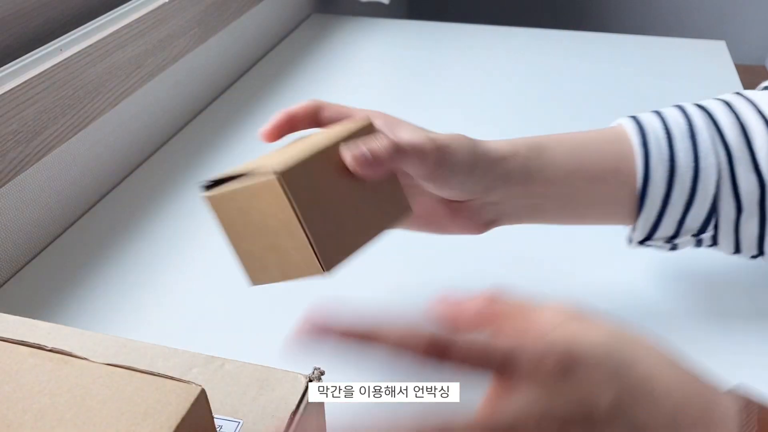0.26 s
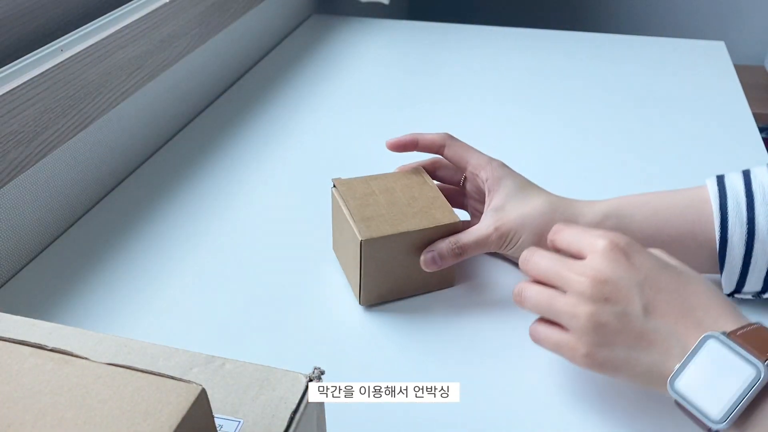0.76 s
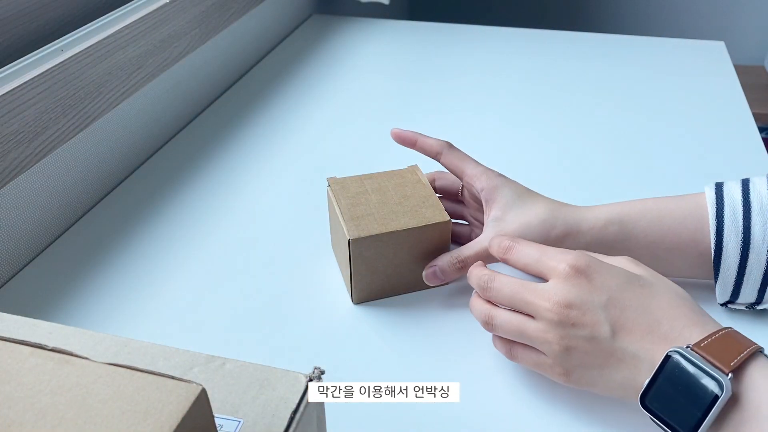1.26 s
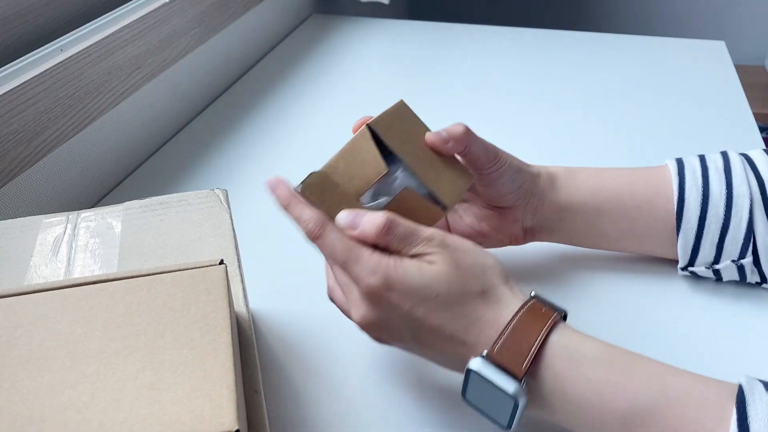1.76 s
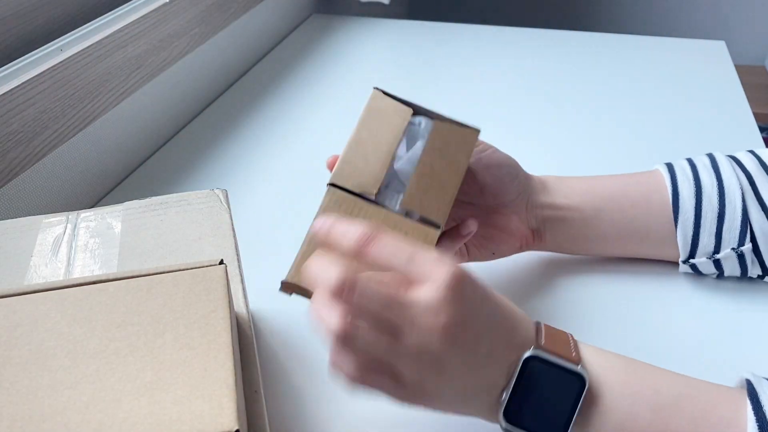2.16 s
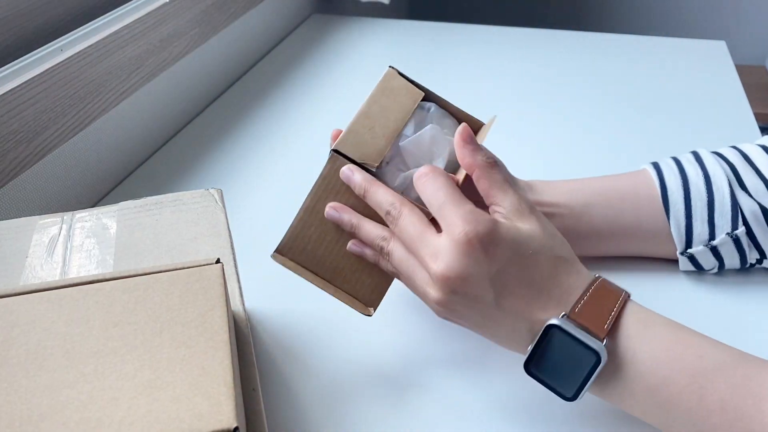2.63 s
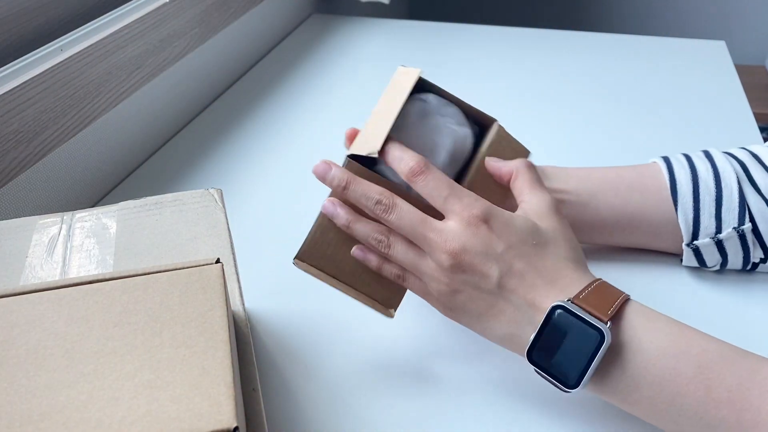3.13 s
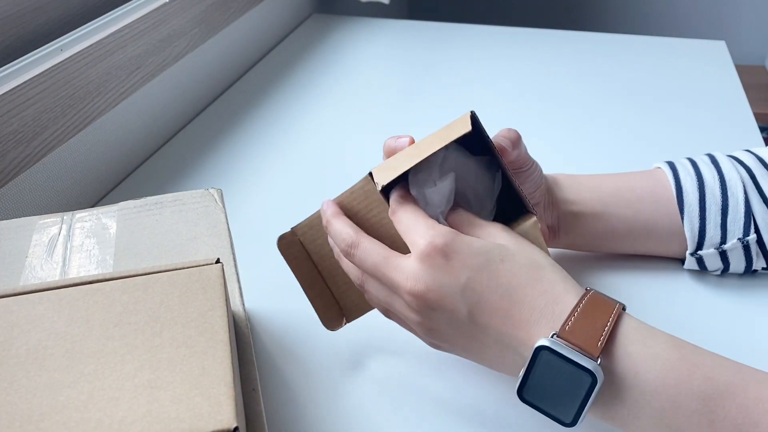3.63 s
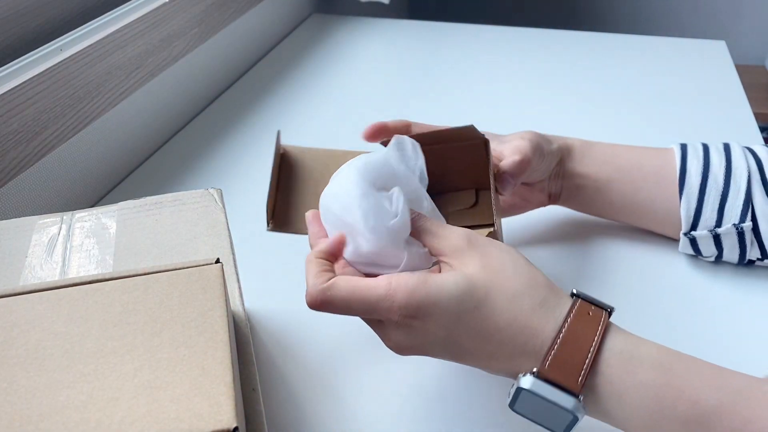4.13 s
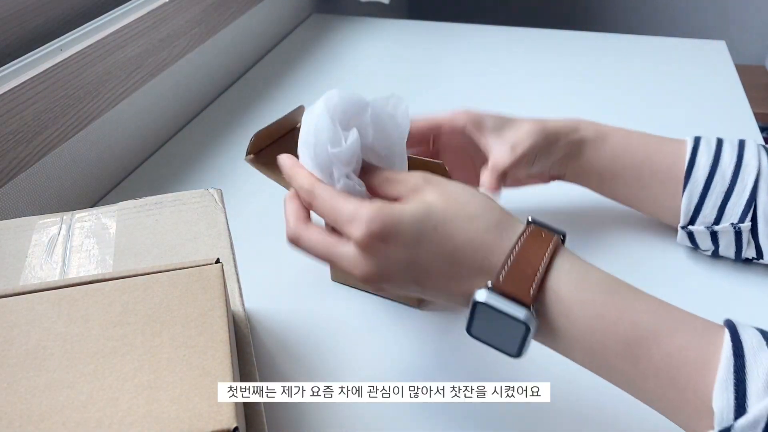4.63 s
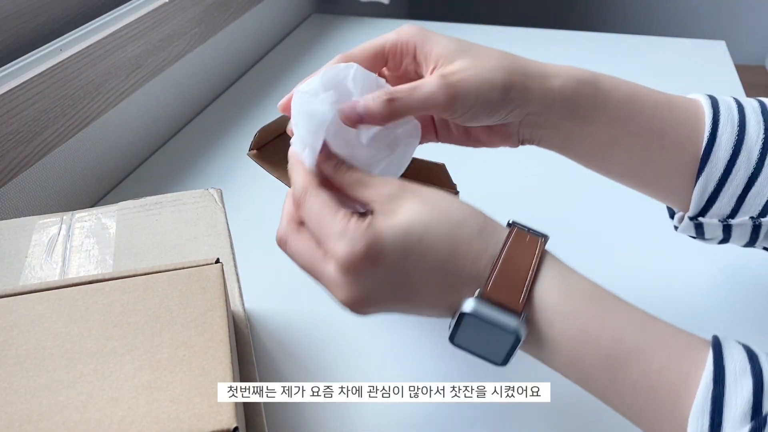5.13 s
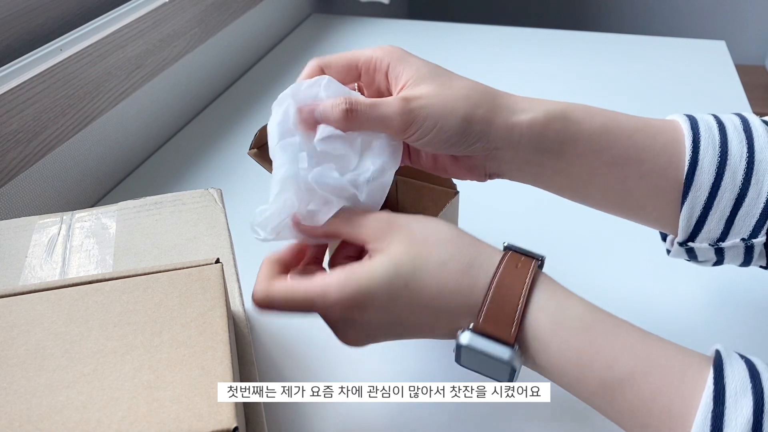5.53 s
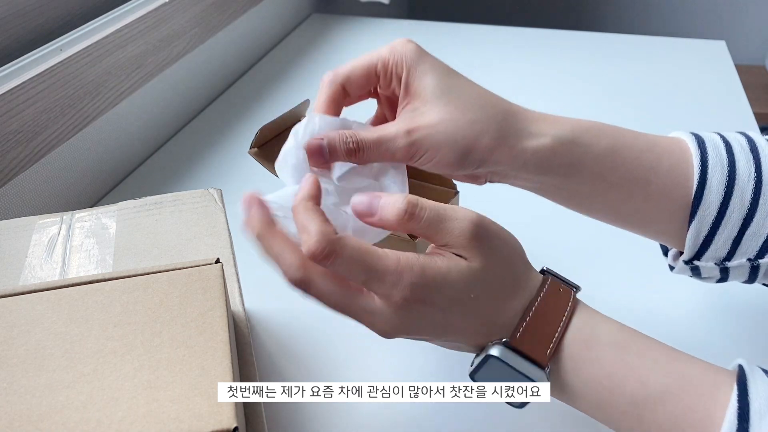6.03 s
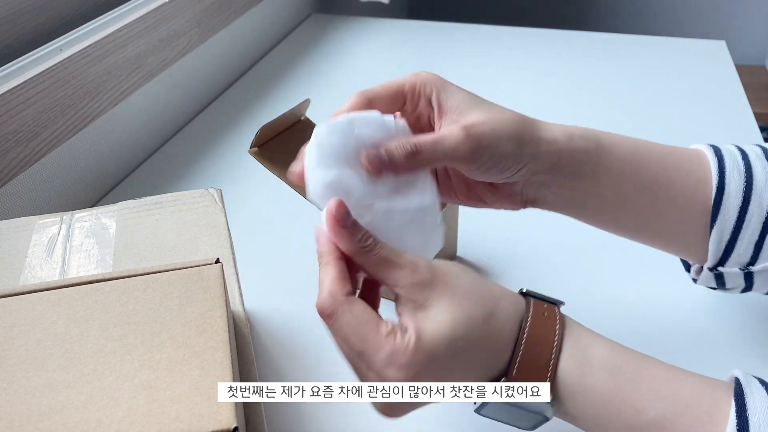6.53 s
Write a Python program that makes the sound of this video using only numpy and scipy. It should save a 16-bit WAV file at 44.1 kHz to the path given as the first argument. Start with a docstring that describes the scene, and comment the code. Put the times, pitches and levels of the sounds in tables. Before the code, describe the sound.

Soft handling rustles, sharp cardboard snaps and scrapes, one hard hollow knock, then delicate crackling tissue paper in a quiet room.

```python
"""Hands open a small cardboard box on a desk and unwrap tissue paper, heard from close by in a quiet room.
First come soft rustles and low bumps: the desk modes ring when pushed. From about 1.6 s come loud snaps,
bursts of noise, and knocks, which excite the panel modes of the box. Rubbing, noise through those modes,
and rustling, crackle over sliding noise, go on to the hardest knock near 4.6 s; after it the rustle of the
tissue and its small bright snaps prevail to the end."""
import sys
import numpy as np
from scipy import signal
from scipy.fft import rfft, irfft, next_fast_len
from scipy.io import wavfile

SR = 44100
rng = np.random.default_rng(int(sys.argv[2]) if len(sys.argv) > 2 else 0)


def dump(signal):
    """Clip the signal to [-1, 1] and save it as 16-bit WAV at the path in sys.argv[1]."""
    limited = np.clip(np.atleast_2d(signal).T, -1, 1)
    pcm = np.round(limited * 32767).astype(np.int16)
    wavfile.write(sys.argv[1], SR, pcm)


N = 298998  # samples

# Steady air noise of the quiet room. Each row: frequency in Hz, relative spectral level in dB.
AIR_SPECTRUM = [(18, -65), (30, 2.5), (73, -20.5), (273, -19), (649, -30.5), (7090, -50), (8980, -36),
                (10800, -45), (16000, -64)]
AIR_DB = -72  # rms level

# Trembling of the desk top under the arms. Each row: time in seconds, level in dB.
TREMBLE = [(0, -71), (.09, -58), (.32, -61), (.4, -74), (.5, -57), (.72, -65), (1.1, -62), (1.5, -73),
           (1.75, -58), (1.92, -68), (1.99, -58), (2.2, -76), (2.47, -49), (2.58, -68), (2.77, -58),
           (3.1, -69), (3.42, -66), (3.49, -57), (3.7, -76), (4.45, -62), (4.9, -74), (5.23, -64),
           (5.33, -74), (5.43, -63), (5.7, -82), (6.25, -69), (6.5, -74), (6.65, -64), (6.78, -61)]
# Bumps on the desk. Each row: start in seconds, peak in dB, pitch of the struck spot in Hz,
# length of the push in cycles of that pitch, share of the free ring time from 0 to 1.
BUMPS = [(0.119, -52, 131, 0.59, 0.8), (0.816, -46.5, 122, 0.88, 1), (0.948, -33, 112, 0.62, 1),
         (2.111, -33, 270, 0.53, 0.41), (2.331, -33, 250, 0.47, 1), (2.445, -42, 115, 0.6, 0.4),
         (2.5, -37, 90, 0.48, 0.27), (2.798, -50, 82, 0.73, 0.59), (3.32, -52, 67.3, 0.7, 0.35),
         (3.91, -45.5, 82, 0.7, 0.85), (4.298, -51, 87, 0.73, 1), (4.594, -28, 95, 0.3, 1),
         (4.596, -23, 270, 0.5, 0.9), (4.71, -36, 112, 0.6, 0.6), (4.783, -42, 120, 0.6, 0.6),
         (4.997, -45.5, 77, 0.97, 0.34), (5.917, -42, 70, 0.8, 0.8), (6.0, -46, 70, 0.8, 0.8)]
# Modes of the desk top. Each row: frequency in Hz, relative level in dB, free t60 in seconds.
DESK_MODES = [(62.6, -6, 0.9), (80.5, 7, 0.58), (115.5, -4, 0.47), (130.5, 10, 0.12), (256.8, 10, 0.17),
              (316, 2.5, 0.38)]
# The trembling that follows a bump: level against the bump's peak, seconds per 10 dB of rise and fall
AFTER_DB, AFTER_RISE_S, AFTER_FALL_S = -12, .015, .08

# Panel modes of the hollow box. Each row: frequency in Hz, relative level in dB.
BOX_MODES = [(270, 4), (345, 2), (420, 0), (530, 1), (640, -0.5), (755, 1), (905, -0.5), (1085, 1),
             (1200, 0), (1380, -3), (1540, -1.5), (2040, -6), (2400, -6), (2800, -5), (3400, -8)]
# Knocks on the box. Each row: start in seconds, peak in dB, pitch of the struck spot in Hz, t60 in seconds.
KNOCKS = [(0.814, -53, 320, 0.046), (0.943, -40.5, 1820, 0.026), (1.582, -46, 2200, 0.05),
          (1.633, -34, 454, 0.054), (1.685, -33, 567, 0.017), (1.729, -20.5, 977, 0.02),
          (1.7305, -19, 2400, 0.01), (1.739, -23, 3300, 0.01), (1.737, -23, 415, 0.016),
          (1.964, -39, 1570, 0.022), (2.089, -29, 1650, 0.035), (2.103, -21, 1700, 0.02),
          (2.105, -15.5, 705, 0.016), (2.239, -20, 1550, 0.023), (2.241, -25, 620, 0.025),
          (2.251, -27.5, 1510, 0.012), (2.307, -29, 1270, 0.012), (2.325, -18.5, 684, 0.013),
          (2.326, -22, 1600, 0.02), (2.346, -31, 260, 0.05), (2.389, -33, 270, 0.05),
          (2.58, -37.5, 1030, 0.058), (2.622, -31.5, 1100, 0.023), (2.784, -41, 1020, 0.067),
          (3.088, -32.5, 584, 0.035), (3.138, -34.5, 790, 0.069), (3.227, -37, 536, 0.038),
          (3.316, -49, 1520, 0.039), (3.416, -48, 590, 0.031), (3.448, -46, 533, 0.053),
          (3.48, -42, 530, 0.07), (3.853, -32, 517, 0.036), (3.905, -34, 1150, 0.03),
          (4.035, -25, 2800, 0.03), (4.036, -27, 1300, 0.015), (4.207, -41, 1050, 0.02),
          (4.23, -39, 1050, 0.03), (4.421, -41.5, 1290, 0.073), (4.476, -47, 720, 0.08),
          (4.534, -34, 680, 0.027), (4.554, -38, 536, 0.017), (4.59, -9, 890, 0.022),
          (4.593, -21, 400, 0.03), (4.624, -30, 1000, 0.04), (4.958, -47.5, 320, 0.035),
          (5.385, -46, 1200, 0.017), (5.45, -50, 900, 0.02), (5.785, -52.5, 1680, 0.035),
          (6.286, -55.5, 1500, 0.037), (6.742, -45.5, 1530, 0.018)]
# Moves of the hands. Each row: time of the peak in seconds, seconds to rise 10 dB, seconds to fall 10 dB,
# bright rustle in dB, dull rustle in dB, rub on the box in dB, pitch of the rubbed panel in Hz.
MOVES = [(.086, .25, .035, -46, -51, -58, 450), (.205, .06, .025, -62, -59, -63, 290),
         (.31, .08, .1, -68, -68, -84, 400), (.45, .02, .06, -67, -64, -56, 700),
         (.46, .03, .05, -90, -90, -59, 290), (.38, .05, .05, -70, -68, -90, 700),
         (.57, .05, .06, -80, -73, -72, 300), (.15, .03, .05, -70, -58, -63, 900),
         (.85, .015, .06, -73, -68, -63, 270), (.96, .015, .07, -80, -61, -72, 510),
         (1.055, .14, .018, -64, -59, -61, 975), (1.18, .2, .15, -87, -86, -94, 300),
         (1.47, .05, .07, -81, -92, -90, 330), (1.59, .008, .08, -70, -54, -48, 1000),
         (1.6, .015, .08, -90, -90, -49, 450), (1.64, .012, .022, -43, -36, -36, 600),
         (1.694, .013, .05, -39, -39, -38, 700), (1.735, .03, .045, -35, -28, -36, 800),
         (1.87, .1, .15, -57, -60, -55, 930), (1.989, .08, .09, -53, -53, -57, 600),
         (2.09, .004, .025, -39, -28, -55, 1200), (2.112, .01, .11, -50, -53, -35, 620),
         (2.251, .009, .1, -42, -37, -40, 930), (2.33, .03, .1, -46, -39, -38, 680),
         (2.4, .04, .08, -41, -34, -39, 800), (2.45, .08, .1, -90, -90, -43, 270),
         (2.575, .1, .04, -54, -47, -57, 520), (2.628, .03, .07, -53, -44, -44, 800),
         (2.79, .06, .04, -57, -54, -55, 750), (2.915, .08, .07, -57, -54, -60, 400),
         (3.087, .06, .035, -55, -52, -55, 570), (3.19, .04, .12, -55, -47, -45, 520),
         (3.265, .12, .05, -90, -90, -47, 1150), (3.325, .03, .045, -46, -47, -53, 1260),
         (3.515, .13, .25, -51, -48, -55, 650), (3.49, .015, .05, -60, -50, -50, 450),
         (3.53, .03, .02, -60, -50, -53, 2200), (3.815, .1, .12, -48, -52, -70, 700),
         (3.915, .06, .08, -55, -48, -42, 1150), (3.88, .03, .12, -90, -90, -47, 500),
         (3.9, .03, .05, -90, -90, -48, 2800), (4.047, .015, .08, -60, -44, -50, 1030),
         (4.13, .05, .2, -55, -53, -58, 900), (4.228, .06, .03, -58, -54, -42, 1050),
         (4.22, .07, .04, -90, -90, -44, 520), (4.33, .12, .1, -53, -57, -63, 700),
         (4.425, .04, .035, -48, -48, -51, 600), (4.535, .05, .05, -45, -43, -44, 630),
         (4.604, .012, .07, -50, -51, -33, 500), (4.69, .08, .08, -52, -55, -45, 800),
         (4.79, .04, .06, -55, -61, -52, 800), (4.96, .1, .2, -50, -52, -59, 600),
         (5.2, .1, .08, -90, -90, -60, 300), (5.24, .15, .05, -47, -49, -60, 1450),
         (5.39, .03, .06, -50, -51, -59, 900), (5.45, .05, .07, -52, -52, -56, 330),
         (5.635, .1, .2, -51, -55, -90, 1600), (5.32, .05, .1, -55, -60, -90, 1500),
         (5.75, .08, .1, -53, -55, -90, 1600), (5.85, .15, .08, -47, -47, -64, 600),
         (5.994, .12, .15, -48, -48, -63, 600), (6.1, .05, .15, -56, -57, -61, 800),
         (6.196, .05, .1, -49, -54, -64, 1250), (6.385, .15, .12, -47, -49, -57, 1560),
         (6.45, .15, .15, -60, -60, -66, 750), (6.6, .08, .25, -48, -45, -57, 1400),
         (6.7, .06, .15, -90, -90, -58, 450), (6.76, .2, .1, -46, -46, -52, 1450)]
RUB_T60_S = .024  # a held panel rings briefly

# Creases and flaps that snap. Each row: start in seconds, peak in dB, brightest part in Hz.
SNAPS = [(.9418, -43, 2500), (1.5216, -56, 3040), (1.5854, -46, 2510), (1.6322, -29, 2800),
         (1.6399, -25, 6200), (1.6864, -27, 6200), (1.7295, -11, 7900), (1.7374, -14, 6440),
         (2.0497, -38, 7110), (2.0864, -22, 3170), (2.0926, -16, 2310), (2.0961, -20, 7800),
         (2.1038, -29, 3320), (2.2393, -22, 6140), (2.2504, -17, 6800), (2.3253, -18, 4800),
         (2.353, -27, 2770), (2.389, -22, 5600), (2.622, -27, 3370), (3.0879, -38, 3430),
         (3.1413, -37, 3580), (3.316, -31, 5830), (3.4054, -40, 3400), (3.8774, -38, 2760),
         (3.9056, -34, 2920), (3.9421, -37, 3680), (4.0367, -25, 2600), (4.081, -24, 9800),
         (4.257, -38, 3580), (4.356, -31, 7460), (4.3949, -33, 10500), (4.4533, -36, 7260),
         (4.481, -38, 3330), (4.5333, -23, 3370), (4.5887, -32, 2470), (4.6251, -21, 3600),
         (4.8343, -39, 6750), (4.9333, -35, 10600), (4.937, -43, 2200), (5.1, -30, 10300),
         (5.1487, -35, 11100), (5.241, -30, 10300), (5.255, -33, 5200), (5.2685, -30, 6740),
         (5.3304, -29, 10900), (5.5807, -37, 10730), (5.6162, -28, 12100), (5.6298, -32, 4970),
         (5.6715, -37, 11600), (5.7096, -37, 10650), (5.7847, -29, 7540), (5.814, -34, 7020),
         (5.829, -37, 10500), (5.84, -34, 5390), (5.8554, -33, 7650), (5.8622, -34, 7960),
         (5.8664, -34, 5120), (5.8794, -37, 8000), (5.9077, -25, 11500), (6.104, -40, 8000),
         (6.1225, -34, 10700), (6.1997, -34, 7120), (6.2891, -36, 6920), (6.4356, -35, 6900),
         (6.5015, -35, 11200)]
SNAP_T60_S, SNAP_SHORTER = .014, .45  # t60 at 5 kHz; it falls with this power of the pitch

# Spectrum of the rustling tissue. Each row: frequency in Hz, relative spectral level in dB.
TISSUE_SPECTRUM = [(350, -67.5), (700, -14), (1150, -6), (1610, -2), (3400, -.5), (8020, -2), (9220, 1),
                   (10900, -2), (13200, -2), (15200, 0), (16500, -50.5)]
# The tissue is held nearer the left side. Each row: frequency in Hz, lead of the left in turns.
TISSUE_LEAD = [(0, 0), (2700, .25), (4500, .35), (6400, 0)]
ECHO_S, ECHO_SHARE = .00061, .17  # delay and amplitude of the tissue's reflection off the desk top

ROOM_DB, ROOM_T60_S, ROOM_TOP_HZ = -13, .3, 5000  # level, decay and treble corner of the walls' answer

# Share of the noise power common to left and right. Each row: frequency in Hz, share from 0 to 1.
ALIKE = [(60, 1), (300, 0.57), (1000, 0.11), (2000, 1), (3500, 0), (5000, 0), (6100, 0), (6800, 1)]
# Phase between left and right. Each row: frequency in Hz, lead of the left in turns.
CHANNEL_LEAD = [(0, 0), (6500, .04), (7050, 0), (8850, -.5), (9300, -.5), (10950, -1), (11350, -1),
                (13050, -1.5), (13550, -1.5), (15250, -2)]
# Balance of left and right. Each row: frequency in Hz, left minus right in dB.
CHANNEL_BALANCE = [(60, 2), (400, 2), (1000, 0), (4400, 3), (6800, 2), (15000, -1)]
LOW_HZ, TOP_HZ = 50, 15900  # edges of the band that is kept


def undb(db):
    """Logarithmic measure: the amplitude ratio of a level in dB."""
    return 10 ** (np.asarray(db) / 20)


def unit(x):
    """Normalization: scale a signal to an rms of one."""
    return x / np.sqrt(np.mean(x ** 2))


def curves(table):
    """Linear interpolation: columns of a table joined by straight lines in time."""
    s, *columns = np.transpose(table)
    return [np.interp(np.arange(N) / SR, s, c) for c in columns]


def along(table, hz):
    """Interpolation by pitch: a table of frequency and value read on a log axis."""
    f, value = np.transpose(table)
    return np.interp(np.log(hz + 1), np.log(f + 1), value)


def shape(x, gain):
    """Linear filtering: multiply the spectrum by a gain that is a function of Hz."""
    size = next_fast_len(x.shape[-1])
    f = np.arange(size // 2 + 1) * SR / size
    return irfft(rfft(x, size) * gain(f), size)[..., :x.shape[-1]]


def bell(hz, centre_hz, octaves):
    """Selectivity: a Gaussian weight on the octave scale."""
    return np.exp(-.5 * (np.log2((hz + 1) / centre_hz) / octaves) ** 2)


def apart(table):
    """Phase shift: gains that turn left and right apart by half the tabled turns each."""
    sides = np.array([[1], [-1]])
    return lambda f: np.exp(1j * np.pi * sides * np.interp(f, *np.transpose(table)))


def add(track, s, sound, db):
    """Superposition: place a sound at its start with the given peak."""
    i = int(s * SR)
    sound = sound[:, :N - i]
    track[:, i:i + sound.shape[1]] += sound * undb(db) / np.abs(sound).max()


def noise():
    """Partial coherence: two channels of white noise, as alike in each band as the ALIKE table sets."""
    alike = lambda f: np.clip(along(ALIKE, f), 0, 1)
    both, left, right = rng.standard_normal((3, N))
    common = shape(both, lambda f: np.sqrt(alike(f)))
    separate = shape(np.array([left, right]), lambda f: np.sqrt(1 - alike(f)))
    return common + separate


def drift(rate):
    """Slow random modulation: normal random levels, this many per second, joined by straight lines."""
    points = rng.standard_normal(256)
    return np.interp(np.arange(N) / SR * rate, np.arange(len(points)), points)


def crackle(rate, spread_db, t60):
    """Stick-slip: an envelope of random slips, sizes exponential in dB, each dying away quickly."""
    sizes = undb(spread_db * np.minimum(rng.exponential(size=N), 3.5))
    slips = (rng.random(N) < rate / SR) * sizes
    decay = np.exp(-np.log(1000) / (t60 * SR))
    return unit(signal.lfilter([1], [1, -decay], slips))


def swells(s, rise_s, fall_s, db):
    """Exponential growth and decay: power of swells, one a row, at every 64th sample."""
    late = np.arange(0, N + 64, 64) / SR - np.asarray(s)[:, None]
    rising = -late / np.reshape(rise_s, (-1, 1))
    falling = late / np.reshape(fall_s, (-1, 1))
    below = np.where(late < 0, rising, falling)  # in tens of dB
    return 10 ** (np.asarray(db)[:, None] / 10 - below) + 1e-14


def full(x):
    """Interpolation in time: from every 64th sample to all."""
    return np.interp(np.arange(N) / 64, np.arange(len(x)), x)


def half_sine(t, contact):
    """Contact force: one half sine push that lasts the contact time."""
    return (t < contact) * np.sin(np.pi * t / contact)


def ring(push, hz, t60):
    """Resonance: one damped mode driven by a force."""
    pole = np.exp(2j * np.pi * hz / SR - np.log(1000) / (t60 * SR))
    return signal.lfilter([1], [1, -pole], push).imag


def air(hiss):
    """Stationary noise: the quiet room heard as steady hiss with a tabled spectrum."""
    swapped = hiss[:, ::-1]
    return unit(shape(swapped, lambda f: undb(along(AIR_SPECTRUM, f)))) * undb(AIR_DB)


def desk_tremble(hiss):
    """Forced vibration: noise drives the lower desk modes under the arms and after each bump."""
    # these modes ring for about a fifth of their free time
    trembling = unit(sum(undb(db) * ring(hiss, hz, 0.21 * t60) for hz, db, t60 in DESK_MODES[:4]))
    s, db = np.transpose(BUMPS)[:2]
    after = swells(s + AFTER_RISE_S, AFTER_RISE_S, AFTER_FALL_S, db + AFTER_DB).sum(0)
    return trembling * np.sqrt(undb(curves(TREMBLE)[0]) ** 2 + full(after))


def desk(hiss):
    """Modal impact: the heavy top rings low and long after a push; a resting hand damps it."""
    out = desk_tremble(hiss)
    t = np.arange(SR // 2) / SR
    for s, db, spot_hz, cycles, free in BUMPS:
        push = half_sine(t, cycles / spot_hz)
        bend = 0
        for hz, mode_db, t60 in DESK_MODES:
            gain = undb(mode_db) * (bell(hz, spot_hz, 0.33) + 0.14) / hz
            bend = bend + gain * ring(push, hz, free * t60)
        add(out, s, np.gradient(bend)[None], db)  # the air follows the speed of the top
    return out


def rub(hiss):
    """Friction: skin and flaps slip over the board and drive the panels near each move's pitch most."""
    s, rise_s, fall_s, _, _, rub_db, spot_hz = np.transpose(MOVES)
    power = swells(s, rise_s, fall_s, rub_db)
    slip = (0.48 + 0.34 * crackle(rate=130, spread_db=3.0, t60=0.02)) * hiss
    reach = [undb(db) * (bell(hz, spot_hz, .36) + .22 * np.minimum(1, hz / spot_hz) ** .6)
             for hz, db in BOX_MODES]
    share = np.array(reach) ** 2
    share = share / share.sum(0)  # each move's power is divided among the panels
    out = 0
    for k, (hz, _) in enumerate(BOX_MODES):
        # a sliding hand changes which panels are free to ring
        level = np.sqrt(full(share[k] @ power)) * undb(2.5 * drift(14))
        out = out + (-1) ** k * level * unit(ring(slip, hz, RUB_T60_S))
    return out


def box(hiss):
    """Modal impact: over the rubbing, knocks ring the panels near the struck spot."""
    out = rub(hiss)
    t = np.arange(4096) / SR
    for s, db, spot_hz, t60 in KNOCKS:
        contact = 0.28 / spot_hz  # a duller knock is a longer push
        shuffle = hiss[:, int(s * SR / 2):][:, :len(t)] * undb(-60 * t / 0.036)
        push = half_sine(t, contact) + .18 * shuffle
        knock = 0
        for k, (hz, mode_db) in enumerate(BOX_MODES):
            nearness = bell(hz, spot_hz, 0.23) + 0.28 * min(1, spot_hz / hz)
            gain = (-1) ** k * undb(mode_db) * nearness
            knock = knock + gain * ring(push, hz, max(t60, .005))
        add(out, s, knock, db)
    return out


def snaps(hiss):
    """Sudden buckling: a burst of noise, broad but brightest where the crease is stiff."""
    out, t = np.zeros((2, N)), np.arange(2048) / SR
    for s, db, hz in SNAPS:
        t60 = SNAP_T60_S * (5000 / hz) ** SNAP_SHORTER
        burst = hiss[:, int(s * SR):][:, :len(t)] * undb(-60 * t / max(t60, .002))
        snap = shape(burst, lambda f: bell(f, hz, 0.3) + 0.39 * bell(f, .8 * hz, 1.1))
        add(out, s, snap, db)
    return out


def rustle_levels():
    """Addition of powers: levels in dB of the bright and the dull rustle over all moves."""
    s, rise_s, fall_s, bright_db, dull_db = np.transpose(MOVES)[:5]
    return [full(10 * np.log10(swells(s, rise_s, fall_s, db).sum(0))) for db in (bright_db, dull_db)]


def tissue():
    """Buckling of tiny creases: a crackle shared by all bands and one of each band, over smooth sliding."""
    bright_db, dull_db = rustle_levels()
    sliding, shared = noise(), crackle(rate=350, spread_db=7.0, t60=0.0094)
    size = next_fast_len(N)
    f = np.arange(size // 2 + 1) * SR / size
    spectrum = 0
    for hz in 1300 * 2 ** np.arange(-.6, 3.8, .3):
        grain = 0.8 + 0.4 * shared + 0.45 * crackle(rate=400, spread_db=5.5, t60=0.016)
        dull_share = np.clip(np.log2(6500 / hz), 0, 1)
        # folds of changing size colour the rustle in patches
        db = bright_db + dull_share * (dull_db + 3 * drift(10) - bright_db)
        spectrum = spectrum + rfft(undb(db) * grain * sliding, size) * bell(f, hz, .14)
    # the tissue is heard again off the desk top, below 7 kHz
    echo = ECHO_SHARE * (f < 7000) * np.exp(-2j * np.pi * f * ECHO_S)
    spectrum = spectrum * (1 + echo) * undb(along(TISSUE_SPECTRUM, f)) * apart(TISSUE_LEAD)(f)
    return irfft(spectrum, size)[:, :N]


def room(near, hiss):
    """Reverberation: the walls answer after a few milliseconds with a duller, decaying noise."""
    t = np.arange(SR // 3) / SR
    walls = hiss[:, -len(t):] * undb(-60 * t / ROOM_T60_S) * (t > .004)
    walls = shape(walls, lambda f: 1 / np.hypot(1, f / ROOM_TOP_HZ))
    walls = walls * undb(ROOM_DB) / np.linalg.norm(walls[0])
    return signal.fftconvolve(near.mean(0)[None], walls, axes=1)[:, :N]


def scene():
    """Superposition: desk, box, snaps and tissue, with the room's answer and its air."""
    hiss = noise()
    near = desk(hiss) + box(hiss) + snaps(hiss) + tissue()
    return near + room(near, hiss) + air(hiss)


def record(dry):
    """Stereo image: left-right phase turns in steps with pitch, the balance tilts, both band ends are cut."""
    sides = np.array([[1], [-1]])
    image = lambda f: apart(CHANNEL_LEAD)(f) * undb(sides * along(CHANNEL_BALANCE, f) / 2)
    low_cut = signal.butter(4, LOW_HZ, "high", fs=SR, output="sos")
    top_cut = signal.ellip(10, .2, 70, TOP_HZ, fs=SR, output="sos")
    sound = signal.sosfilt(low_cut, shape(dry, image))
    return signal.sosfilt(top_cut, sound)


dry = scene()
out = record(dry)
dump(out)
```